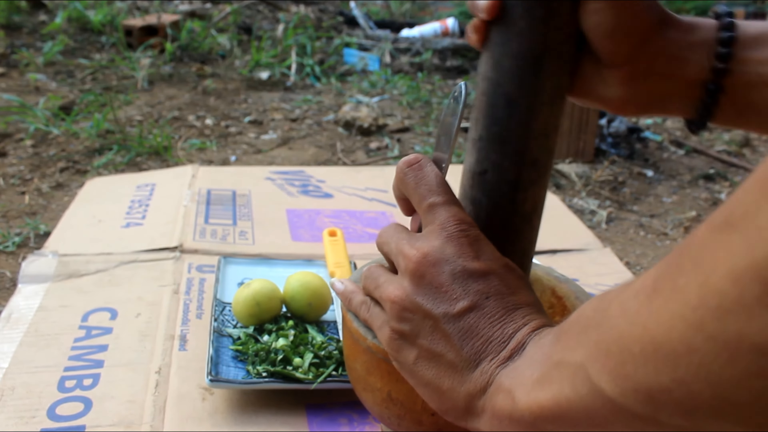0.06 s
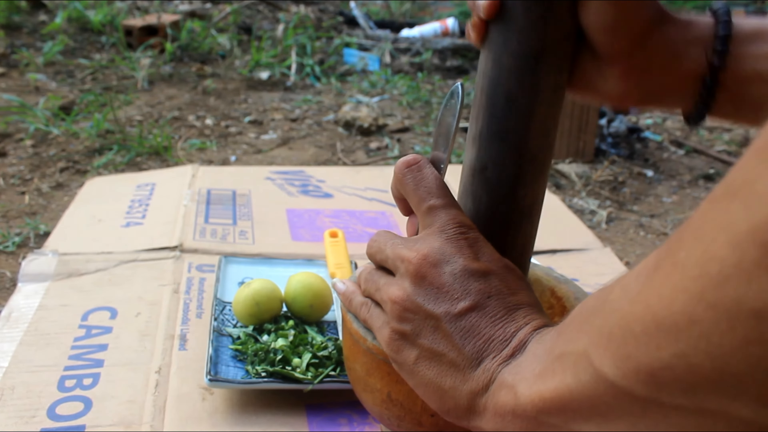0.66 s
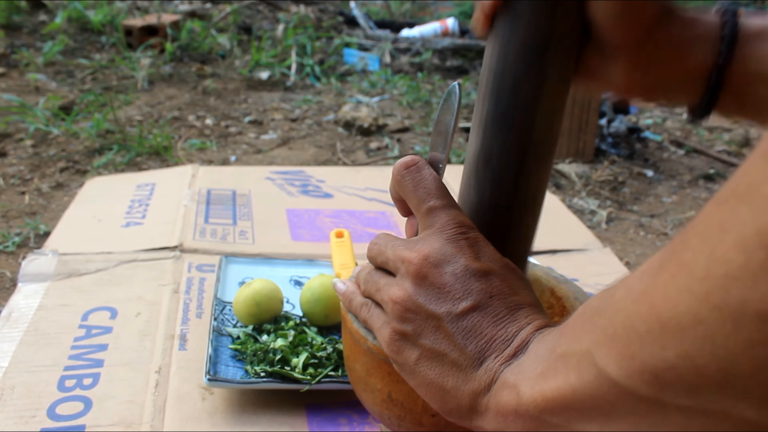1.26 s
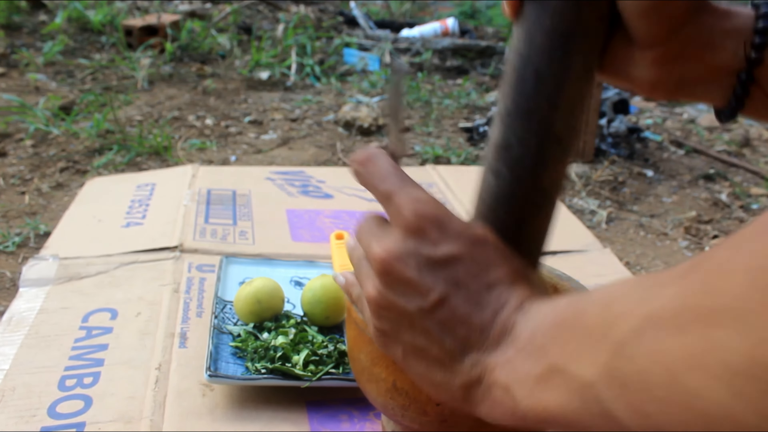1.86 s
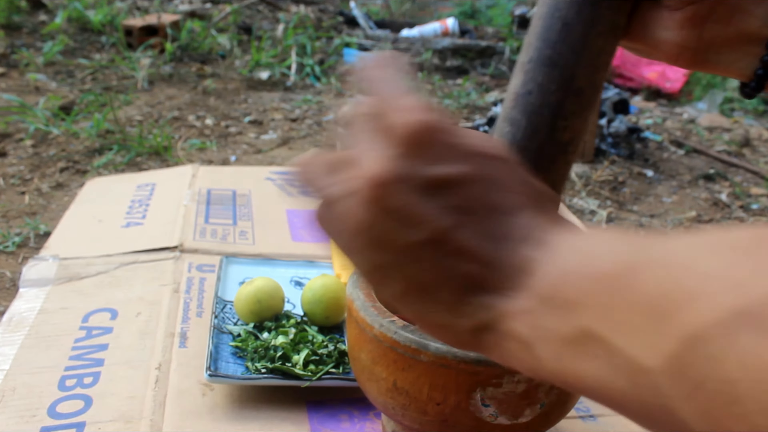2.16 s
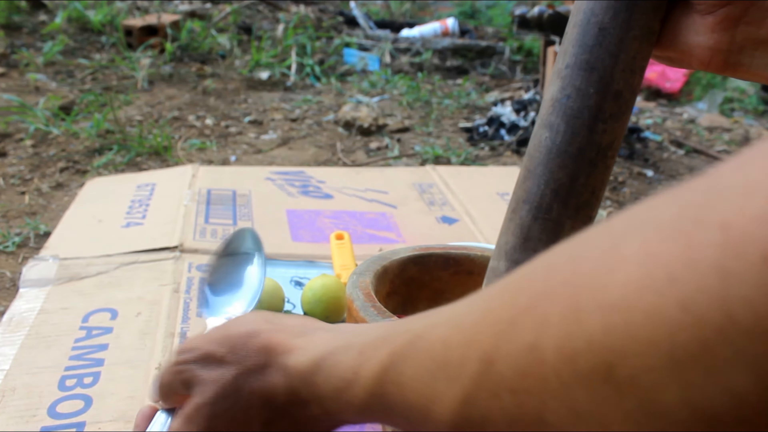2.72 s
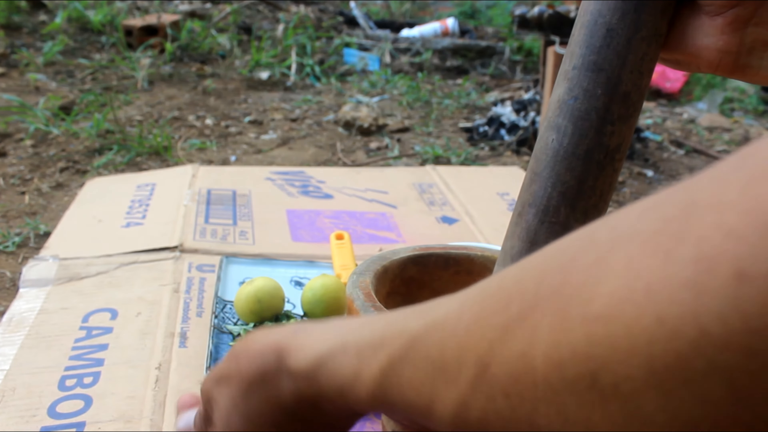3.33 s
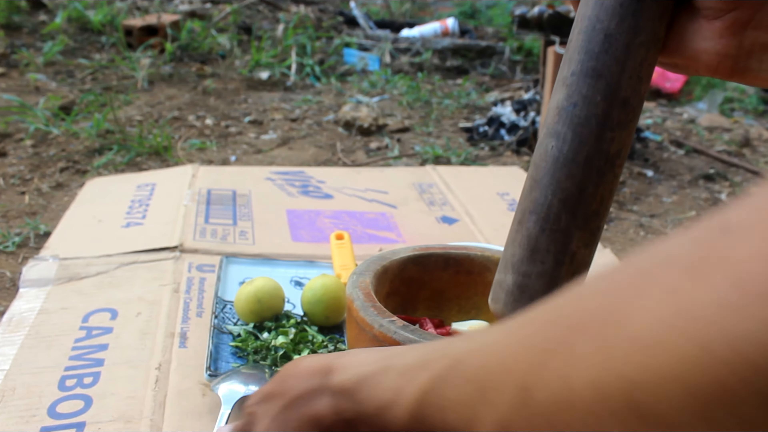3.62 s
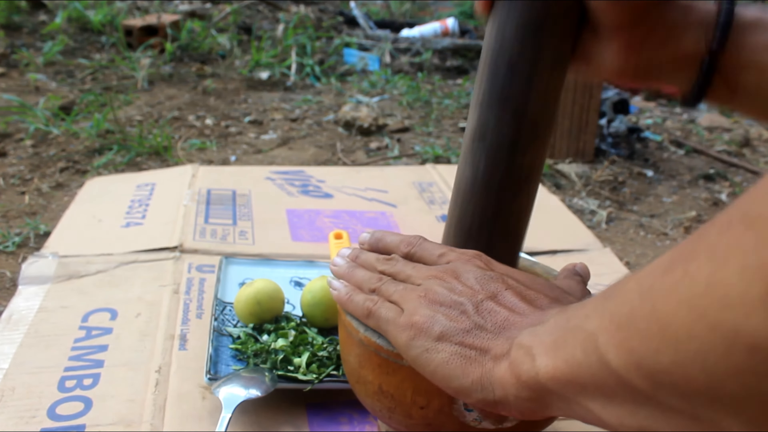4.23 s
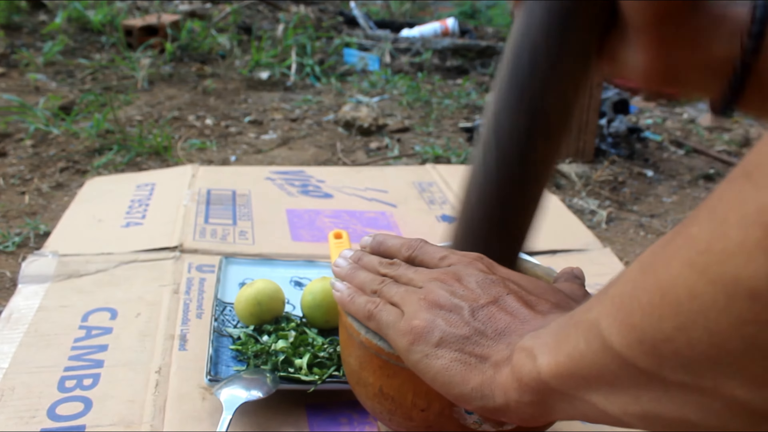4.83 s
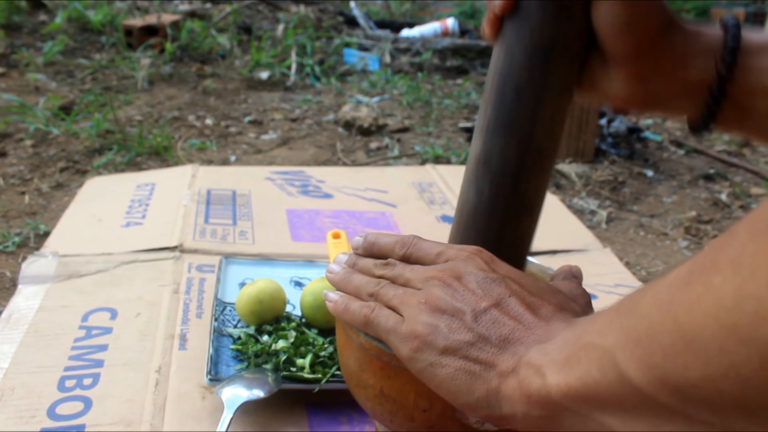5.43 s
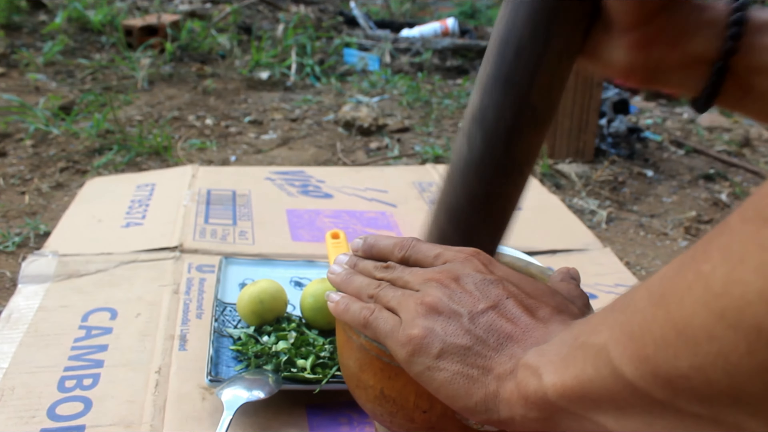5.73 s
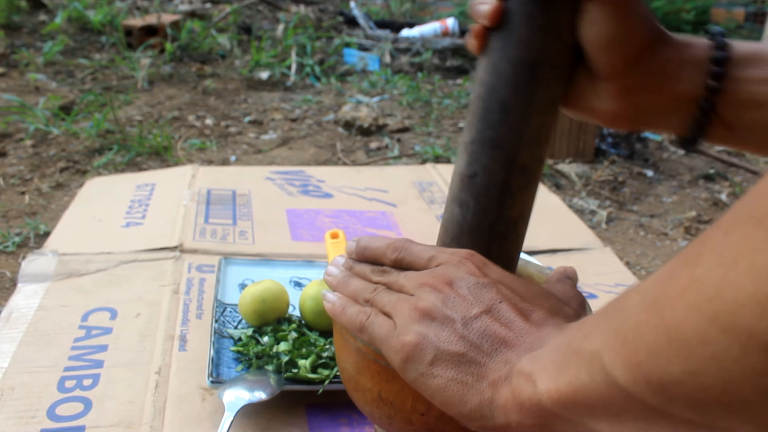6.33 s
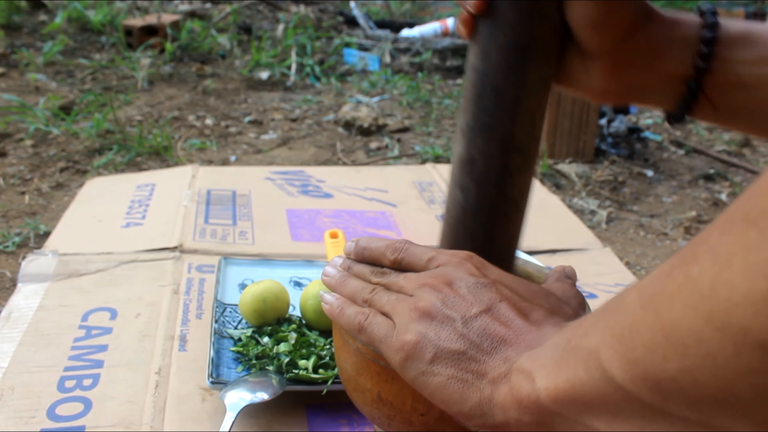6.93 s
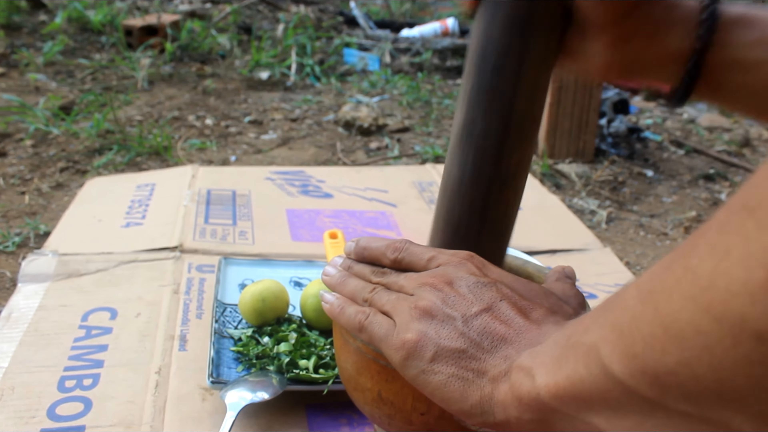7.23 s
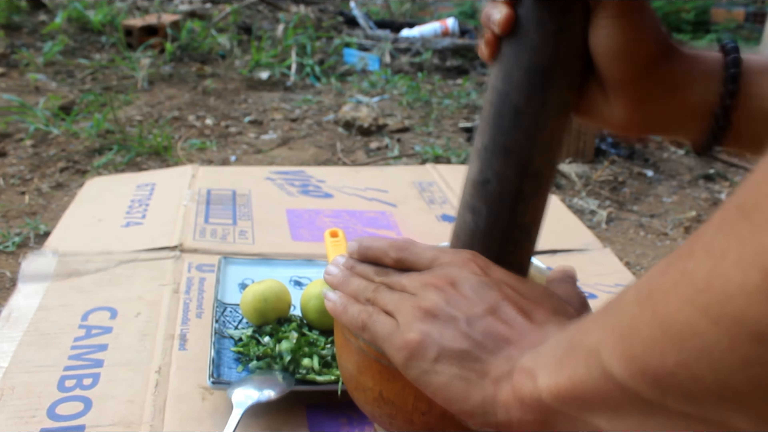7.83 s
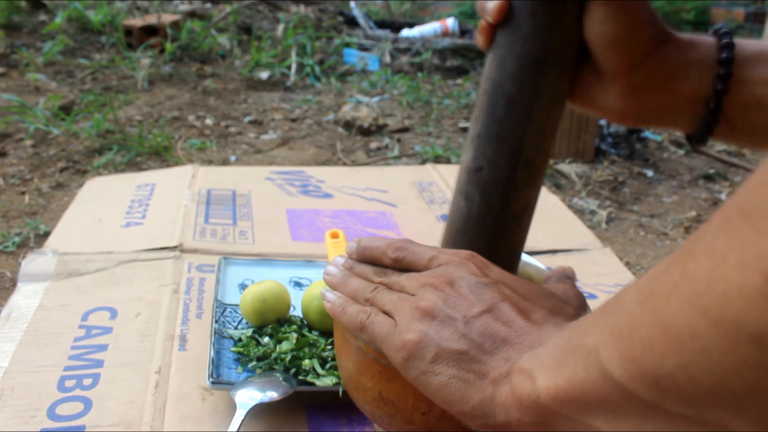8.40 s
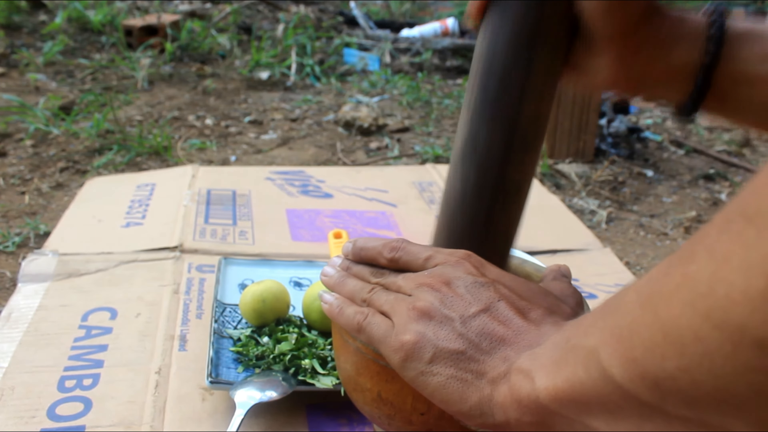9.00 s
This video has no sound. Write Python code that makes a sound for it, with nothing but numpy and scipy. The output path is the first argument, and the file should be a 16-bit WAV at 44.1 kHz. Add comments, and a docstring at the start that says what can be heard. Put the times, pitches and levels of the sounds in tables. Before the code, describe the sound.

Close by, a wooden pestle pounds chillies and garlic in a wooden mortar, each knock carrying a slight squelch and jolting a steel spoon into a clinking rattle. The pounding stops for about two seconds, the spoon is laid on a tray, then the blows resume at about four a second. Faint chicks peep and a rooster crows far off, over a low rumble of distant traffic in an open yard.

```python
"""A wooden pestle thuds into chillies and garlic in a wooden mortar that stands on cardboard in a yard.
Each blow crushes the pulp, excites the damped modes of the bowl and jolts a steel spoon, which clinks
on the tray beside it; the pounding pauses in the middle. Chicks peep and a rooster crows far off, over
a rumble of distant traffic. The hardest hits overload the microphone."""
import sys
import numpy as np
from scipy import signal
from scipy.fft import rfft, irfft, next_fast_len
from scipy.io import wavfile
from scipy.ndimage import uniform_filter1d, map_coordinates

SR = 44100
rng = np.random.default_rng(int(sys.argv[2]) if len(sys.argv) > 2 else 0)


def wrap_up_sound(samples):
    """Save the sound to the file named by the first command line argument, as 16-bit audio."""
    columns = np.atleast_2d(samples).T
    # keep every value between -1 and 1, then stretch to whole-number steps
    tamed = np.clip(columns, -1, 1)
    steps = np.round(tamed * 32767).astype(np.int16)
    wavfile.write(sys.argv[1], SR, steps)


N = 403956
T = np.arange(N) / SR
AGE = T[:int(SR * .3)]  # seconds since a contact

# Strokes of the pestle. Each row: start in seconds, level in dB, thud in dB, hardness in dB, pulp in dB,
# time to reach the bottom in seconds, level at the bottom in dB, rebound in dB.
STROKES = [(0, -13.5, -6, -2.5, -25, 0.0068, -29, -24.5), (0.2927, -14.5, 11, 3, -28, .01, -17.5, -12.5),
           (0.578, -10, 8, -14, -19.5, .008, -17, -16.5), (0.8485, -15.5, 9, 0, -20, 0.0081, -14.5, -16.5),
           (1.137, -14, 7.5, -4, -28, .011, -12.5, -14), (1.5189, -10.5, -19.5, -7.5, -57, .012, -38, -34),
           (1.8603, -33.5, -13, 22, -60, 0.0089, -50, -55), (3.3984, -31, -1, 0, -60, .01, -50, -55),
           (4.1276, -11, -3.5, -3.5, -24.5, 0.01, -21.5, -27),
           (4.3917, -29, 10, 19, -20, 0.011, -18.5, -31), (4.632, -25.5, 9.5, -4, -28, 0.011, -17, -23.5),
           (4.8689, -20.5, 3, 8, -25.5, .012, -17, -25),
           (5.105, -5.5, -10.5, -11.5, -22, 0.015, -21.5, -22.5),
           (5.3485, -16.5, 11, -2, -24, 0.014, -16, -34),
           (5.5954, -13, -3.5, -4.5, -22.5, 0.02, -23.5, -23.5),
           (5.822, -19.5, 15, -8, -20.5, 0.0092, -18, -21), (6.0523, -14, 15, -4, -24, .014, -18, -25),
           (6.2834, -16.5, 16, -17, -21, .015, -19.5, -20),
           (6.5105, -16, 2, -11, -27.5, 0.01, -22.5, -25.5),
           (6.8767, -15.5, -14.5, -15, -33.5, 0.023, -25.5, -34), (7.114, -30, -8, 1, -26, 0.017, -33, -24),
           (7.358, -26, 0.5, 1, -26, 0.013, -19, -22.5), (7.585, -28, 6.5, 3, -29.5, .014, -26, -25),
           (7.8164, -10, -9.5, -17, -31.5, .012, -28, -29), (8.049, -1.5, -18, -18, -21.5, .012, -43, -29),
           (8.317, -14.5, -17, -7, -40, .012, -27, -40), (8.3923, -15.5, -9, -5, -35, .012, -31, -39),
           (8.647, -30, 3.5, -4, -30.5, 0.0052, -11, -41), (8.8885, -14, -5.5, -8, -19, 0.008, -17.5, -44)]
# Modes of the bowl and of the spoon and tray. Each row: frequency in Hz, relative level in dB,
# 60 dB decay time in seconds before the sustain factor of ring().
MORTAR_MODES = [(176, 0, 0.078), (291, -8, 0.13), (376.5, -6.5, 0.077), (463, -5.5, 0.037),
                (642, 0.5, 0.039), (790, -10, .03), (885, 0, .044), (1030, -2, .037), (1140, -2, .037),
                (1485, 0, 0.013), (1803, -10.5, 0.052)]
STEEL_MODES = [(1005, -18, .14), (2176, -2, .14), (2190, -4, .15), (2975, -12, .1), (3052, -1, .13),
               (3835, -11, .1), (3985, -1, .165), (4450, -15, .05), (4868, 0, .135), (5328, -9, .16),
               (5585, -5, .135), (6537, -9, .19), (7136, -6, .16), (7338, -8, .17), (7725, -13, .15),
               (7890, -8, .18), (8117, -12, .14), (8760, -20, .16), (8888, -18, .15), (9076, -22, .14),
               (9768, -20, .16), (10114, -11, .17), (10535, -25, .16), (11150, -31, .05), (11850, -34, .1),
               (12660, -30, .15), (12860, -32, .15), (13130, -34, .12), (14850, -38, .07)]
# Noise spectra. Each row: frequency in Hz, relative spectral density in dB.
CARDBOARD_SPECTRUM = [(30, -18), (130, -1), (280, 4), (550, -1.5), (1100, -4), (1600, -12), (3000, -17),
                      (7000, -39), (14000, -77)]
PULP_SPECTRUM = [(300, 9.5), (1500, -4), (4000, 3.5), (7000, 3), (9500, -12.5), (12000, -28), (16000, -51)]
RUMBLE_SPECTRUM = [(15, -27), (30, -16), (50, -7), (100, 3.5), (165, 0.5), (230, -9.5), (330, -21.5),
                   (700, -39), (2000, -85)]
AIR_SPECTRUM = [(100, 0.5), (300, 10), (600, 3.5), (1200, 1.5), (2800, -1), (4500, -1), (6000, -6),
                (8000, -10), (10000, -26), (13000, -35), (16000, -62)]
SCRAPE_SPECTRUM = [(300, -8.5), (1500, -11), (2300, -1), (3300, 4.5), (5200, -2.5), (7800, 8.5),
                   (10000, -28), (11500, -33), (16000, -55)]
# Glancing blows on the wall. Each row: start in seconds, level in dB, upper mode relative to lower in dB.
GLANCES = [(0.0, -4, -15.5), (1.519, -12, -38), (1.862, -21.5, -22), (4.129, -8.5, -7.5),
           (5.596, -16.5, -4), (6.875, -20.5, -3), (8.394, -15.5, -7), (8.894, -9.5, -13.5)]
# Bending modes of the pestle. Each row: frequency in Hz, 60 dB decay time in seconds.
SHAFT_MODES = [(1160, 0.044), (1559, 0.32)]
# Thicker pulp thuds more and yields for longer. Each row: thud in dB, squeezing time in seconds.
SQUEEZE_TIMES = [(-10, .002), (-2.5, .012), (13.5, .011)]
# Background of the yard. Each row: time in seconds, relative levels of rumble and of air in dB.
YARD_LEVELS = [(0, -28, -37.5), (.45, -26, -40.5), (.85, -30.5, -45), (1.15, -26, -40.5),
               (1.8, -31.5, -45.5), (3.3, -32.5, -47), (4.2, -34.5, -47), (4.65, -36, -46),
               (5.1, -35.5, -47.5), (6.5, -37.5, -51.5), (7.1, -31.5, -48.5), (7.85, -39.5, -50.5),
               (8.5, -32.5, -45.5), (9.16, -43, -54)]
# A distant engine. Each row: time in seconds, firing rate in Hz, level in dB.
ENGINE_DRONE = [(0, 48.1, -34), (.55, 51.9, -33), (1.1, 55, -40), (1.55, 54.5, -37), (1.85, 56.5, -30),
                (2.4, 55.6, -44), (2.7, 56.2, -50), (4, 56.1, -45), (5, 57, -66)]
# Jumps of the spoon. Each row: landing in seconds, first end in dB, gap in seconds, second end in dB,
# rocking period in seconds, rocking in dB, then relative levels of the low, 4 kHz and high modes in dB.
SPOON_JUMPS = [(.0526, -19, 0.027, -20, .05, -31, 0, -3.5, -1),
               (0.365, -14.5, 0.028, -17, 0.023, -33, 3, 0.5, 1),
               (0.639, -15.5, .0415, -9.5, 0.049, -23, 0.5, -6, -2.5),
               (.9047, -18, 0.026, -18.5, 0.027, -29, -1, -3.5, -5),
               (1.1896, -11.5, 0.063, -19.5, .023, -28, 2, -2, -6.5),
               (1.548, -24, .0556, -22.5, .03, -49, -5, -6, -8.5),
               (3.5143, -13.5, 0.0062, -10.5, 0.011, -21, 4.5, 0.5, 1.5),
               (4.1863, -13, 0.012, -13.5, 0.025, -50, 1, -3, -11),
               (4.4288, -25, 0.014, -20.5, 0.038, -38, 0, -1.5, -8),
               (4.6701, -18.5, .056, -23.5, 0.011, -21.5, -1, -5.5, -7.5),
               (4.922, -24, 0.0082, -7.5, 0.044, -21.5, -4.5, 6.5, 0),
               (5.1661, -15, 0.039, -27, 0.044, -45, 4.5, 0.5, -5.5),
               (5.3938, -15.5, 0.023, -9, 0.032, -17.5, 1, -4, -9),
               (5.6527, -11.5, 0.047, -24.5, 0.042, -47, 1.5, -1, -7),
               (5.8681, -11, 0.02, -11, 0.038, -14.5, -2, -4.5, -4.5),
               (6.1156, -15, .0098, -6, .02, -35, 2, 1, -9),
               (6.3359, -12, 0.011, -9, 0.054, -13.5, 0, 0.5, -4),
               (6.5731, -9.5, 0.049, -22.5, 0.044, -42, 0, -3.5, -4.5),
               (6.922, -19, 0.01, -12, .078, -25.5, -3, -1.5, -1),
               (7.119, -26, 0.017, -9.5, 0.045, -15.5, -10, -7, -1.5),
               (7.373, -10, 0.046, -10, 0.053, -17, -1, -6, 1),
               (7.6034, -11, 0.044, -10.5, 0.039, -21.5, -7, -8, -2),
               (7.835, -22.5, 0.047, -11.5, 0.045, -23, -6, -3, -2.5),
               (8.0691, -7.5, 0.045, -10.5, 0.048, -26, -6, 4, -1),
               (8.3293, -18, 0.027, -31, 0.024, -45, -5, 8, -1),
               (8.4011, -13.5, 0.032, -12.5, 0.024, -18, -6, -1, -1.5),
               (8.6615, -8, 0.06, -9.5, 0.031, -17, -7.5, 2.5, -0.5),
               (8.906, -15, 0.041, -12, .118, -33.5, -10, 4, -2.5)]
# Peeps of the chicks. Each row: start in seconds, relative level in dB, pace factor, pitch ratio.
PEEPS = [(0.219, -43, 2.2, .78), (1.379, -43, 1.1, 0.98), (1.93, -42, 1.23, 0.96),
         (2.035, -35.5, 4.2, 0.69), (2.431, -42.5, 1.04, 0.96), (2.66, -44, 2.4, .53),
         (2.7, -46, 2.3, 0.69), (2.821, -42.5, 1.04, 0.97), (3.02, -40.5, 2.4, .75),
         (3.22, -41, 1.12, 0.96), (3.7, -42, .8, 0.95), (3.88, -45, 1.15, .72), (4.05, -41.5, 3.1, 0.67),
         (4.23, -45, 1.5, .98), (7.21, -43.5, 0.64, 0.9)]
# One peep at unit pace and pitch ratio. Each row: age in seconds, pitch in Hz, relative level in dB.
PEEP_GLIDE = [(0, 5850, -7), (.025, 6130, 6), (.07, 6300, -2.5), (.11, 5900, 3), (.17, 5500, 2),
              (.22, 5210, -9), (.28, 4400, -37)]
# Calls of the rooster. Each row: start, length and syllable length in seconds, top of the pitch arch
# in Hz, relative level in dB.
CROWS = [(0.894, 0.45, 0.24, 1066, -33), (3.078, 0.69, .165, 1082, -37), (7.166, .28, 0.3, 1080, -37),
         (8.62, .515, 0.63, 884, -41)]

REBOUND_S = .028  # duration of the mortar's hop
PULP_LEAD = .18  # the skins burst this share of the squeezing time ahead of the knock
SLIDE_S = .011  # the spoon starts to slip this long before it lands
HELD_FROM_S, HELD_TO_S = 3.4, 3.7  # the hand still holds the spoon as it lays it down
ROCK_JITTER, ROCK_LOSS_DB = .22, 13.5  # scatter of the rocking period, loss from one rock to the next
AGC_THRESHOLD_DB, AGC_SHARE, AGC_ATTACK_S, AGC_RECOVERY_DB_PER_S = -18, .45, .034, 15.5
BAND_LIMIT_HZ = 15500


def amp(db):
    """Amplitude grows tenfold for every 20 dB."""
    return 10 ** (np.asarray(db) / 20)


def unit(x, span=None):
    """Normalisation to rms 1, taken over the first span samples or over the whole."""
    return x / np.sqrt(np.mean(x[:span] ** 2) + 1e-20)


def attack_unit(x):
    """Normalisation of a transient to rms 1 over its first 9 ms."""
    return unit(x, span=int(.009 * SR))


def spectral_gain(points, size):
    """Interpolation of (Hz, dB) points on a log frequency axis gives the gain of each FFT bin."""
    hz, db = np.transpose(points)
    bin_hz = np.fft.rfftfreq(size, 1 / SR)
    return amp(np.interp(np.log(bin_hz + 1), np.log(hz + 1), db))


def curves(rows, at):
    """Linear interpolation of each later column against the first."""
    knots, *columns = np.transpose(rows)
    return [np.interp(at, knots, column) for column in columns]


def wobble(rate, n):
    """Smooth random modulation: a spline through rate knots a second."""
    knots = rng.standard_normal(int(n * rate / SR) + 4)
    return map_coordinates(knots, [np.arange(n) * rate / SR])


def noise(spectrum, n):
    """Spectral weighting turns white noise into coloured noise of rms 1."""
    size = next_fast_len(n)
    white = rfft(rng.standard_normal(size))
    return unit(irfft(white * spectral_gain(spectrum, size), size)[:n])


def colour(x, points):
    """A minimum-phase filter: folding the cepstrum makes the (Hz, dB) response causal."""
    size = 2 * next_fast_len(len(x))
    cepstrum = irfft(np.log(spectral_gain(points, size)))
    cepstrum[1:size // 2] *= 2
    cepstrum[size // 2 + 1:] = 0
    return irfft(rfft(x, size) * np.exp(rfft(cepstrum)))[:len(x)]


def fade(t60):
    """Damping gives an exponential decay of 60 dB in t60 seconds."""
    return np.exp(-np.log(1000) * AGE / t60)


def ring(modes, scatter_db, detune, sustain):
    """Free vibration is a sum of damped modes, whose strengths depend on the point of contact."""
    hz, db, t60 = np.transpose(modes)[:, :, None]
    spread, shift, side = rng.standard_normal((3, len(modes), 1))
    strength = np.sign(side) * amp(db + scatter_db * spread)
    phase = 2 * np.pi * hz * (1 + detune * shift) * AGE
    return attack_unit(np.sum(strength * fade(sustain * t60) * np.sin(phase), axis=0))


def tone(hz):
    """Phase is the integral of frequency: a sine of rms 1 follows a pitch curve."""
    return np.sqrt(2) * np.sin(2 * np.pi * np.cumsum(hz) / SR)


def add(track, start_s, sound):
    """Superposition: a sound adds to the track from its start time on."""
    start = max(round(start_s * SR), 0)
    track[start:start + len(sound)] += sound[:max(N - start, 0)]


def outdoors(x, t60, wet_db):
    """Scattering from ground, walls and trees adds a diffuse tail of echoes."""
    tail = rng.standard_normal(len(AGE)) * fade(t60)
    return x + amp(wet_db) * signal.fftconvolve(x, tail / np.linalg.norm(tail))[:N]


def knock(db, thud_db, hard_db):
    """Contact stiffness shapes an impact's spectrum: pulp gives a thud, bare wood a dry crack."""
    soft_db = np.clip(thud_db, -14, 3)
    rocking = amp(-6.5 + 1.1 * soft_db + 5.7 * wobble(150, len(AGE))) * fade(.18)
    shudder = noise(CARDBOARD_SPECTRUM, len(AGE)) * (amp(5) * fade(.034) + rocking)
    bowl = ring(MORTAR_MODES, scatter_db=2.7, detune=.0097, sustain=.55)
    blow = bowl + shudder * (1 - np.exp(-AGE / .0015))
    contact = [(50, -13.5), (270, 1.02 * thud_db + 4.5), (560, .76 * soft_db),
               (880, -.5), (1200, -3.5), (1750, .86 * hard_db + 5)]
    return amp(db + .5) * attack_unit(colour(blow, contact))


def mortar():
    """Three impacts excite the bowl: the pestle strikes, meets the bottom, and the mortar rebounds."""
    out = np.zeros(N)
    for start, db, thud_db, hard_db, _, travel, bottom_db, rebound_db in STROKES:
        add(out, start, knock(db, thud_db, hard_db))
        add(out, start + travel, knock(bottom_db, thud_db=.5, hard_db=-5.5))
        add(out, start + travel + REBOUND_S, knock(rebound_db, thud_db=2, hard_db=-2))
    return out


def pestle():
    """A glancing blow excites two bending modes of the shaft; the point of contact sets their balance."""
    out = np.zeros(N)
    lower, upper = [fade(t60) * np.sin(2 * np.pi * hz * AGE) for hz, t60 in SHAFT_MODES]
    for start, db, upper_db in GLANCES:
        add(out, start, amp(db) * (lower + amp(upper_db) * upper))
    return out


def crush(db, squeeze_s):
    """Compression ends in rupture: the skins burst with a snap and leave a gritty squelch."""
    since_burst = np.maximum(AGE - squeeze_s, 0)
    rise_db = np.minimum(22 * (AGE / squeeze_s - 1), 0)
    swell = amp(rise_db - 60 * since_burst / (.012 + 7 * squeeze_s))
    snap = (1 - np.exp(-since_burst / .0002)) * amp(8.5 - 60 * since_burst / .012)
    grit = amp(5.5 * wobble(450, len(AGE)))
    squelch = (swell * grit + snap) * noise(PULP_SPECTRUM, len(AGE))
    energy = np.sum(squelch ** 2) / SR
    return amp(db + 2) * squelch / np.sqrt(energy / .0098)


def pulp():
    """Pulp yields under pressure at the blow and again at the bottom; a thin layer mostly snaps."""
    out = np.zeros(N)
    for start, _, thud_db, _, db, travel, bottom_db, _ in STROKES:
        squeeze_s = curves(SQUEEZE_TIMES, thud_db)[0]
        add(out, start - squeeze_s * (1 + PULP_LEAD), crush(db, squeeze_s))
        add(out, start + travel - squeeze_s, crush(bottom_db - 11.5, squeeze_s))
    return out


def traffic_and_air():
    """Traffic and open air give broadband noise; the periodic firing of one engine gives a tone."""
    rumble_db, air_db = curves(YARD_LEVELS, T)
    engine_hz, engine_db = curves(ENGINE_DRONE, T)
    rumble = amp(rumble_db + .15 + .09 * wobble(6.9, N)) * noise(RUMBLE_SPECTRUM, N)
    air = amp(air_db + 6.5 + .81 * wobble(5.5, N)) * noise(AIR_SPECTRUM, N)
    return rumble + air + amp(engine_db) * tone(engine_hz)


def scrape():
    """Contact noise of steel on steel builds up in a fraction of a millisecond."""
    return noise(SCRAPE_SPECTRUM, len(AGE)) * (1 - np.exp(-AGE / .0003))


def slide(db):
    """Sliding friction between spoon and tray gives a short, gritty swell."""
    swell = np.interp(AGE, [0, SLIDE_S / 2, SLIDE_S, 2 * SLIDE_S], [0, 1, 1, 0])
    grit = amp(5 * wobble(300, len(AGE)))
    return amp(db) * swell * grit * scrape()


def clink(db, low_db, middle_db, high_db, held):
    """An inelastic impact rings the steel, chatters in ever weaker bounces and bumps the cardboard."""
    buzz = amp(-7 + 6.9 * wobble(310, len(AGE))) * fade(.092)
    tick = amp(-9) * fade(.021)
    steel = ring(STEEL_MODES, scatter_db=3, detune=.00058, sustain=.9) + scrape() * (tick + buzz)
    for k, delay in enumerate(np.cumsum(rng.uniform(.0023, .013, size=5))):
        bounce = ring(STEEL_MODES, scatter_db=5.5, detune=.00053, sustain=.54)
        bounce += amp(1.5) * fade(.012) * scrape()
        steel += amp(-7.5 - 2.8 * k) * np.pad(bounce, (int(delay * SR), 0))[:len(AGE)]
    lowest_db = low_db - 1.5 - 18 * held  # fingers damp the lowest modes
    contact = [(500, .11), (1000, .38 * lowest_db), (2200, lowest_db), (2950, .63 * low_db),
               (3150, low_db), (3800, middle_db), (4100, middle_db), (4700, .26), (5700, .0067),
               (6500, high_db), (13200, high_db), (15500, high_db - 6)]
    bump = amp(-18) * fade(.089) * (1 - fade(.0078)) * noise(CARDBOARD_SPECTRUM, len(AGE))
    return amp(db) * (attack_unit(colour(steel, contact)) + bump)


def spoon_on_tray():
    """The jolted spoon loses energy in collisions: it lands on one end, then the other, and rocks."""
    out = np.zeros(N)
    for start, first_db, gap, second_db, period, rocking_db, low_db, middle_db, high_db in SPOON_JUMPS:
        held = HELD_FROM_S < start < HELD_TO_S
        add(out, start - SLIDE_S, slide(first_db - 21))
        add(out, start, clink(first_db, low_db, middle_db, high_db, held))
        last_rock = period * (1 + np.exp(ROCK_JITTER * rng.standard_normal()))
        later_low_db = low_db + 3.5  # the second end stirs more of the low modes
        for delay, db in [(0, second_db), (period, rocking_db), (last_rock, rocking_db - ROCK_LOSS_DB)]:
            add(out, start + gap + delay, clink(db, later_low_db, middle_db, high_db, held))
    return out


def chicks():
    """Growing random frequency modulation turns each falling peep from thin to raspy."""
    out = np.zeros(N)
    age = T[:SR // 2]
    for start, db, pace, pitch_ratio in PEEPS:
        hz, glide_db = curves(PEEP_GLIDE, age * pace)
        rasp = np.interp(age * pace, [.04, .13], [.028, .08])
        quaver = 1 + rasp * wobble(900, len(age)) + .015 * wobble(25, len(age))
        envelope = amp(db + glide_db - 8 + 2.2 * wobble(29, len(age)))
        add(out, start, envelope * tone(pitch_ratio * hz * quaver))
    return outdoors(out, t60=.45, wet_db=3.5)


def rooster():
    """One partial of the arching call carries from afar; frequency jitter makes it hoarse."""
    out = np.zeros(N)
    for start, length, syllable, hz, db in CROWS:
        arch = np.abs(np.sin(np.pi * T[:int(length * SR)] / syllable))
        jitter = .045 * wobble(140, len(arch)) + .025 * wobble(12, len(arch))
        add(out, start, amp(db - 7.5) * arch * tone(hz * (.9 + .1 * arch + jitter)))
    return outdoors(out, t60=.22, wet_db=-6)


def gain_control(x):
    """Compression removes a share of the level above a threshold; the gain then creeps back up."""
    power = np.abs(uniform_filter1d(x[1] ** 2, size=256))
    excess_db = np.maximum(10 * np.log10(power + 1e-12) - AGC_THRESHOLD_DB, 0)
    recovery_db = AGC_RECOVERY_DB_PER_S * T
    cut_db = np.maximum.accumulate(AGC_SHARE * excess_db + recovery_db) - recovery_db
    pole = np.exp(-1 / (AGC_ATTACK_S * SR))
    return x * amp(-signal.lfilter([1 - pole], [1, -pole], cut_db))


def scene():
    """Sound from the front reaches both channels almost together, so the sum is nearly mono."""
    near = outdoors(mortar() + pestle() + pulp() + spoon_on_tray(), t60=.27, wet_db=-24)
    mono = near + chicks() + rooster() + traffic_and_air()
    return np.array([np.pad(mono, (1, 0))[:N], mono])  # the left channel is one sample late


def record(dry):
    """The gain ducks after hits, saturation flattens the peaks, and a low-pass limits the band."""
    ducked = gain_control(dry)
    clipped = ducked / (1 + np.abs(ducked) ** 8) ** (1 / 8)
    size = next_fast_len(N + SR // 4)
    passband = np.fft.rfftfreq(size, 1 / SR) < BAND_LIMIT_HZ
    return irfft(rfft(clipped, size) * passband, size)[:, :N]


dry = scene()
out = record(dry)
wrap_up_sound(out)
```